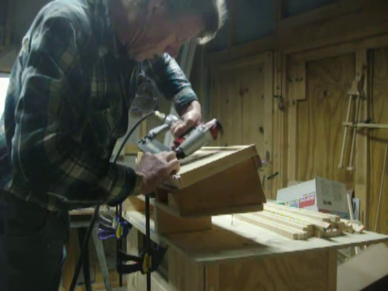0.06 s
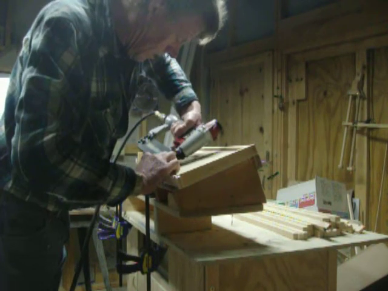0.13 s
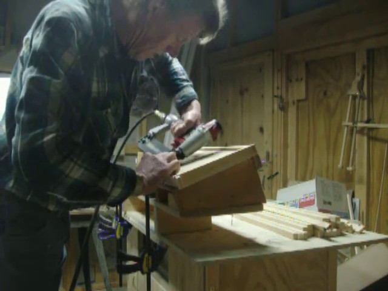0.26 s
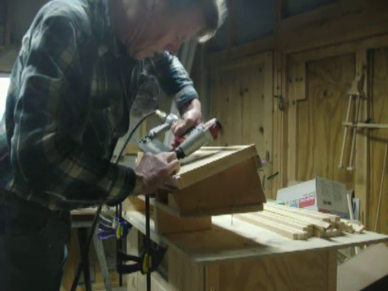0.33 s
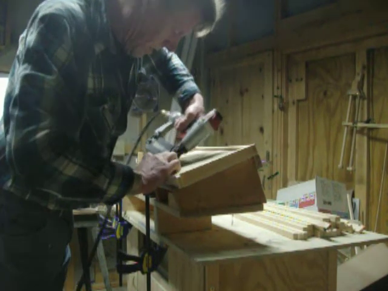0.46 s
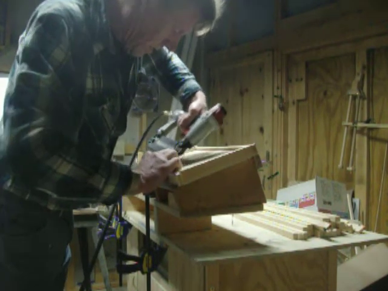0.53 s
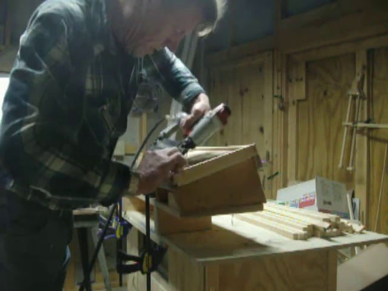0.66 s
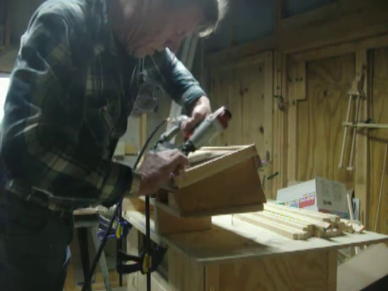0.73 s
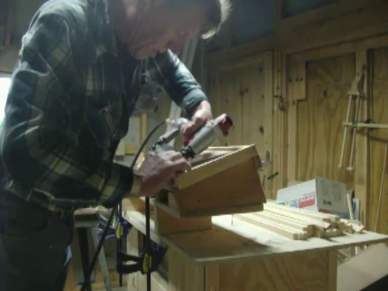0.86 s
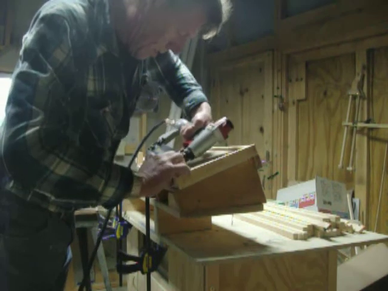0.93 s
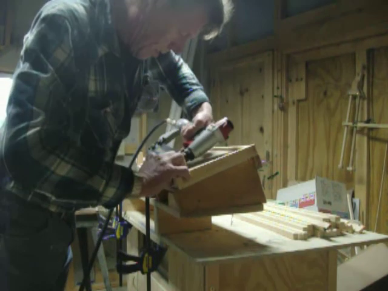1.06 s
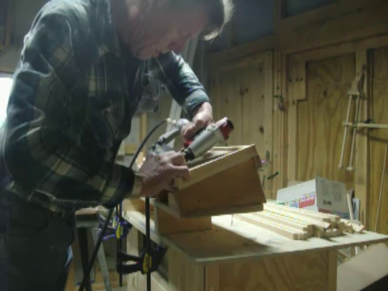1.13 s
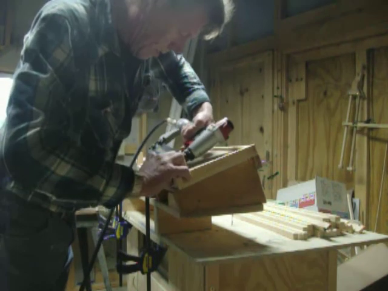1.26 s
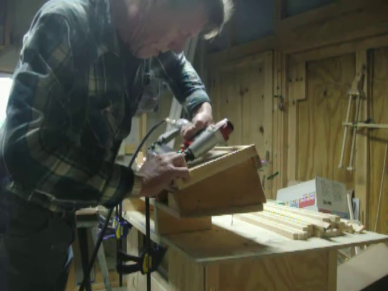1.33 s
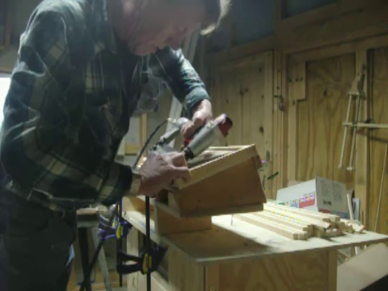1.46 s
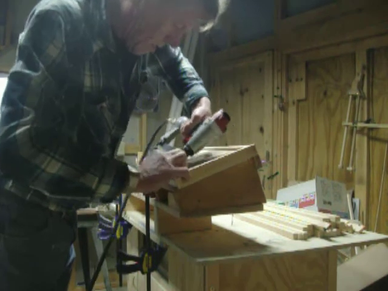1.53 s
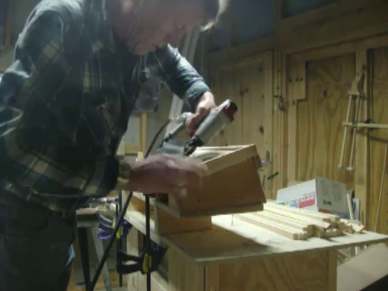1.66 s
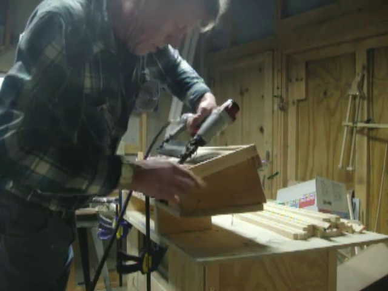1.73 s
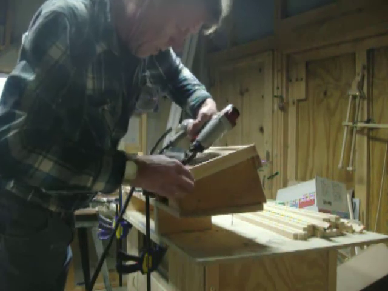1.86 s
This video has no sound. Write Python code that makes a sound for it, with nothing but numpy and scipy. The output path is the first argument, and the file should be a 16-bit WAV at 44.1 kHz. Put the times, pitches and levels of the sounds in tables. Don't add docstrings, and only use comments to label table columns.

```python
import sys
import numpy as np
from scipy import signal
from scipy.fft import rfft, irfft
from scipy.io import wavfile
from scipy.ndimage import uniform_filter1d

SR = 44100
rng = np.random.default_rng(int(sys.argv[2]) if len(sys.argv) > 2 else 0)


def wav_record(signal):
    frames = np.transpose(np.atleast_2d(signal))
    bounded = np.clip(frames, -1, 1)
    quanta = np.round(bounded * 32767).astype(np.int16)
    wavfile.write(sys.argv[1], SR, quanta)


def boost(x):
    u = np.asarray(x, float) / 20
    return 10 ** u


N = 83790

# time_s, rumble_db
HANDLING = [(0, -44.5), (.06, -40), (.13, -44), (.2, -29.5), (.3, -73.5), (.68, -58), (.76, -45),
            (.88, -42.5), (1.12, -44.5), (1.25, -41), (1.3, -35), (1.4, -57), (1.78, -58), (1.9, -46.5)]
# start_s, level_db, pitch_hz, ring_t60_s
TICKS = [(.170, -29.5, 3790, 0.032), (.183, -34, 3900, 0.011), (.193, -8.5, 3100, 0.0057),
         (.207, -33.5, 3900, .01), (.211, -30, 3900, 0.014), (.8948, 1.5, 3810, 0.0051),
         (.895, -17.5, 4310, 0.011), (.895, -16, 3100, .006), (0.896, -19, 2780, 0.021),
         (.896, -12.5, 640, 0.0076), (1.273, -29, 3730, 0.0066), (1.277, -48, 3900, 0.078),
         (1.295, -42, 3900, 0.015)]
# start_s, length_s, hiss_db, rise_s, air_push_db
VALVES = [
    (0.173, 0.02, -37.5, 0.00048, -46),
    (1.269, 0.023, -49, .001, -53),
    (0.2113, .027, -11.5, 0.0023, -11),
    (0.3803, 0.033, -12, 0.0027, -37.5),
    (1.301, 0.046, -11.5, .004, -16),
    (1.487, .024, -11, 0.0032, -25.5),
]
# start_s, crack_db, slam_db, slam_width_s, exhaust_db
BLOWS = [
    (0.2393, 12, -4, .0004, -7.5),
    (.4022, 8, -13.5, 0.0002024, -10.5),
    (1.3294, 7, -4.5, 0.00057, -7),
    (1.509, 3, -11.5, .0003, -9),
]
# time_s, pressure_db
DRAG = [
    (.698, -71),
    (.704, -44),
    (.72, -39.5),
    (.731, -34.5),
    (.745, -23),
    (.77, -32),
    (.80, -31),
    (.83, -45),
]
# start_s, level_db, pitch_hz
SKIPS = [
    (.704, -30.5, 1045),
    (.712, -29, 1214),
    (0.718, -31, 1000),
]
# start_s, level_db
KNOCKS = [
    (.739, -15),
    (0.746, -14),
    (.752, -12.5),
    (0.765, -14.5),
    (0.777, -16.5),
    (0.794, -17.5),
    (0.855, -21.5),
]

# frequency_hz, level_db
ROOM_HUM = [(60, -32.5), (235, -2.5), (420, 5.5), (1500, -3.5), (3400, -9), (3900, -10), (4400, -16),
            (6000, -17.5)]
BENCH_RUMBLE = [(20, -9.5), (55, -2), (150, -7.5), (300, -1.5), (600, -22)]
CIRCUIT_HISS = [(300, -13.5), (5000, -3), (6500, -8)]
VALVE_HISS = [(200, -32), (1000, -12.5), (2100, -12), (2700, 0.5), (3900, -6.5), (4600, -3.5), (5400, -9),
              (6300, -9)]
BLOW_CRACK = [(60, -26), (250, -13), (600, -7.5), (1400, -7.5), (2500, -1.5), (3300, -5.5), (3850, -4.5),
              (4600, -14), (6200, -26.5)]
NOSE_SNAP = [(60, -26.5), (300, -5), (1000, -4), (1700, -9), (2100, -1.5), (3300, -8), (4000, -7.5),
             (4700, -17), (6200, -19)]
WOOD_RUB = [(60, -57), (130, -3.5), (500, 0), (1100, -7.5), (1700, -10), (3200, -11), (3950, -12.5),
            (4600, -18), (6200, -37)]

# pitch_hz, level_db, t60_s
NOSE_MODES = [(2040, -41.5, 1.3), (2070, -44, 1.5), (2180, -41, 0.68), (1500, -37.5, 0.16), (1000, -39, 1),
              (3030, -45, 0.92), (4190, -47.5, 0.87), (3920, -47.5, 0.84), (4440, -39, 0.25)]
FRAME_MODES = [(216, -5.5, 0.054), (427, 0, 0.051), (640, -18, 0.24), (1033, 3, .05), (1185, 0.5, .05),
               (1438, -6.5, 0.089)]
NAIL_MODES = [(1180.6, 6.5, 0.038), (659, 1.5, .03), (189.5, -8, 0.076)]
BODY_MODES = [(437, -2, 0.013), (618, 2.5, 0.02), (773, -8.5, 0.062), (2500, -23.5, 0.021),
              (3900, -9, 0.012)]

# frequency_hz, t60_s
SHOP_DECAY = [(60, 0.13), (160, 0.28), (300, 0.31), (500, 0.59), (1100, 0.43), (2200, .4), (3900, 0.43),
              (5200, 0.38)]


def evened(x):
    return x / np.sqrt(np.mean(x ** 2) + 1e-20)


def read(points, hz):
    f, value = np.transpose(points)
    return np.interp(np.log(hz + 1), np.log(f + 1), value)


def curve(points):
    s, db = np.transpose(points)
    return boost(np.interp(np.arange(N) / SR, s, db))


def add(mix, start_s, sound):
    part = mix[round(start_s * SR):][:len(sound)]
    part += sound[:len(part)]


def noise(spectrum, size):
    gain = boost(read(spectrum, np.fft.rfftfreq(size, 1 / SR)))
    return evened(irfft(rfft(rng.standard_normal(size)) * gain, size))


def click(spectrum):
    level_db = np.maximum(read(spectrum, abs(np.fft.fftfreq(8192, 1 / SR))), -80)
    log_gain = np.log(boost(level_db))
    pulse = np.fft.ifft(np.exp(np.conj(signal.hilbert(log_gain)))).real[:4096]
    return pulse / abs(pulse).max()


def ring(modes):
    t = np.arange(SR // 2) / SR
    return sum(boost(db - 60 * t / t60) * np.sin(2 * np.pi * hz * t) for hz, db, t60 in modes)


def push(db):
    u = np.arange(6000) / SR / 0.027
    return boost(db) * (1 - 1.2 * u) * np.exp(-u) * np.minimum(u * 12, 1)


def shop(x, wet_db):
    wall_s, early_db, early_s = 0.01, 4.5, 0.0062
    taps = np.zeros(SR)
    at = np.arange(0, SR - 12, 12)
    taps[at + rng.integers(0, 12, len(at))] = rng.choice([-1., 1.], len(at))
    hz, t, z = signal.stft(taps, SR, nperseg=1024)
    decay = boost(-60 * t / read(SHOP_DECAY, hz)[:, None])
    tail = signal.istft(z * decay, SR, nperseg=1024)[1]
    tail = tail * (1 + boost(early_db) * np.exp(-np.arange(len(tail)) / SR / early_s))
    tail = np.append(np.zeros(round(wall_s * SR)), tail / np.linalg.norm(tail))
    return x + boost(wet_db) * signal.fftconvolve(x, tail)[:N]


def hum():
    hum_db, patch_db = -44, 1.5
    z = signal.stft(noise(ROOM_HUM, size=N), SR, nperseg=512)[2]
    patches = uniform_filter1d(rng.standard_normal(z.shape), 6, 0)
    patches = evened(uniform_filter1d(patches, 10, 1))
    air = signal.istft(z * boost(patch_db * patches), SR, nperseg=512)[1][:N]
    return boost(hum_db) * air + curve(HANDLING) * noise(BENCH_RUMBLE, size=N)


def circuit():
    return boost(-62.5) * noise(CIRCUIT_HISS, size=N)


def ticks():
    rise_s, edge_db = .0015, -17
    snap_s, snap_db, rattle_db, rattle_s = .8955, -10.5, -33.5, 0.061
    out, snap, t = np.zeros(N), np.zeros(N), np.arange(4096) / SR
    for start_s, db, hz, t60 in TICKS:
        ping = np.minimum(t / rise_s, 1) ** 2 * ring([(hz, db, t60)])[:4096]
        add(out, start_s, ping + boost(db + edge_db) * click(BLOW_CRACK))
    add(snap, snap_s, boost(snap_db) * click(NOSE_SNAP))
    rattle = np.exp(-t / rattle_s) * noise(NOSE_SNAP, size=4096)
    add(snap, snap_s + 0.0021, boost(rattle_db) * rattle)
    add(out, snap_s, ring(NOSE_MODES))
    out = shop(out, -14.5) + shop(snap, 7.5) - 0.68 * snap
    add(out, snap_s, push(-30)[::3])
    return out


def valves():
    fade_db, pop_db = -11, 12
    hiss, steps = np.zeros(N), np.zeros(N)
    for start_s, length_s, db, rise_s, push_db in VALVES:
        t = np.arange(0, length_s, 1 / SR)
        flow = np.minimum(t / rise_s, 1) ** 2 * boost(db + fade_db * t / length_s)
        add(hiss, start_s, flow * noise(VALVE_HISS, size=4096)[:len(t)])
        add(steps, start_s + rise_s, push(push_db))
        add(hiss, start_s + rise_s, boost(db + pop_db) * click(NOSE_SNAP))
    return shop(hiss, -6) + steps


def blows():
    rise_s, exhaust_s, frame_db, recoil_db = 0.0028, 0.031, -8.5, -10
    out, t = np.zeros(N), np.arange(8192) / SR
    for start_s, crack_db, slam_db, width_s, air_db in BLOWS:
        echoed, u = np.zeros(N), t / width_s
        gush = boost(air_db) * np.minimum(t / rise_s, 1) ** 2 * np.exp(-t / exhaust_s)
        add(echoed, start_s + 6 * width_s, boost(crack_db) * click(BLOW_CRACK))
        add(echoed, start_s, gush * noise(BLOW_CRACK, size=8192))
        add(echoed, start_s, boost(frame_db + slam_db) * ring(FRAME_MODES))
        out += shop(echoed, -2.5)
        slam = boost(slam_db) * 0.59 * u ** 2 * (3 - u) * np.exp(-u)
        add(out, start_s, slam)
        add(out, start_s + width_s, boost(slam_db) * ring(NAIL_MODES))
        add(out, start_s, np.repeat(push(slam_db + recoil_db), 2))
    return out


def scrape():
    grit_db, skip_t60_s, knock_rise_s = 2.2, .03, 0.0014
    t = np.arange(N) / SR
    grit = boost(grit_db * evened(uniform_filter1d(rng.standard_normal(N), 80)))
    touching = (t > DRAG[0][0]) * (t < DRAG[-1][0])
    rub = curve(DRAG) * touching * evened(grit * noise(WOOD_RUB, size=N))
    for start_s, db, hz in SKIPS:
        add(rub, start_s, ring([(hz, db, skip_t60_s)]))
    for start_s, db in KNOCKS:
        knock = ring([(hz * rng.uniform(0.977, 1.05), d, t60) for hz, d, t60 in BODY_MODES])
        add(rub, start_s, boost(db - 2.5) * knock * np.minimum(t[:len(knock)] / knock_rise_s, 1))
    rub = signal.sosfilt(signal.butter(2, 150, "high", fs=SR, output="sos"), rub)
    return shop(rub, -5)


def ducking(x):
    power_db = 10 * np.log10(abs(uniform_filter1d(x ** 2, 400)) + 1e-12)
    back_db = np.arange(N) * 10.0 / SR
    held_db = np.maximum.accumulate(np.minimum(power_db, -14) + back_db) - back_db
    over_db = np.maximum(held_db + 24, 0)
    return boost(-.6 * uniform_filter1d(over_db, 400))


def scene():
    tool = valves() + blows() + ticks() + scrape()
    return (tool + ducking(tool) * hum() + circuit())[None]


def low_pass(x):
    return signal.sosfilt(signal.butter(12, 15900, fs=SR, output="sos"), x)


def record(dry):
    port_hz, port_width_hz, port_db = 3900, 816, 4
    capsule_top, knee, edge_hz, clip_top = 0.5, 8.4, 6820, .725
    port = signal.lfilter(*signal.iirpeak(port_hz, port_hz / port_width_hz, fs=SR), dry)
    x = dry + boost(port_db) * port
    x = x / (1 + abs(x / capsule_top) ** knee) ** (1 / knee)
    x = signal.sosfilt(signal.cheby2(16, 95, edge_hz, fs=SR, output="sos"), x)
    x = signal.sosfilt(signal.butter(1, 18, "high", fs=SR, output="sos"), x)
    return low_pass(np.clip(x, -clip_top, clip_top))


dry = scene()
out = record(dry)
wav_record(out)
```